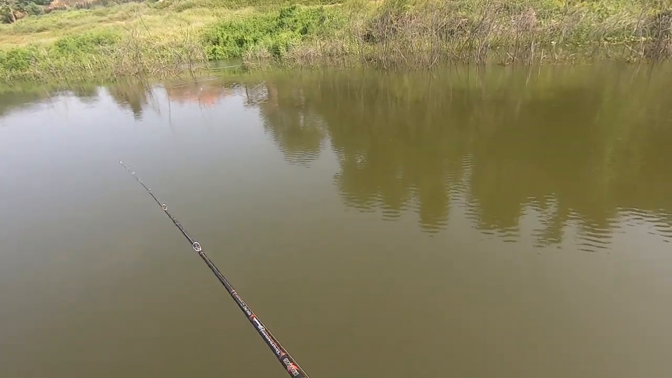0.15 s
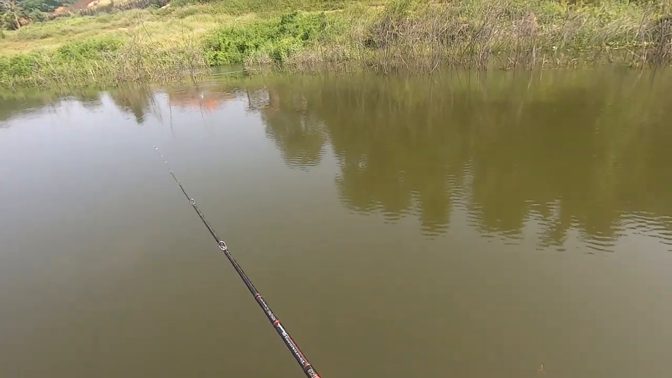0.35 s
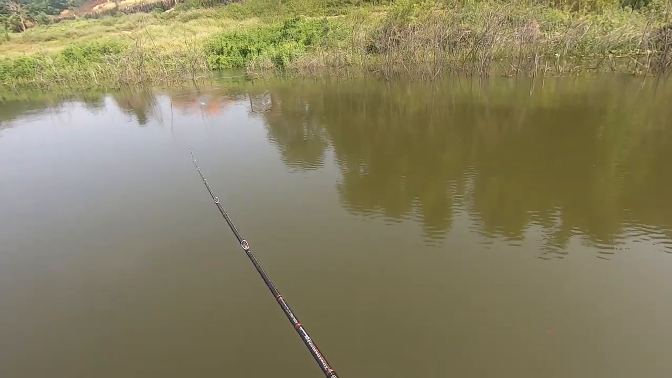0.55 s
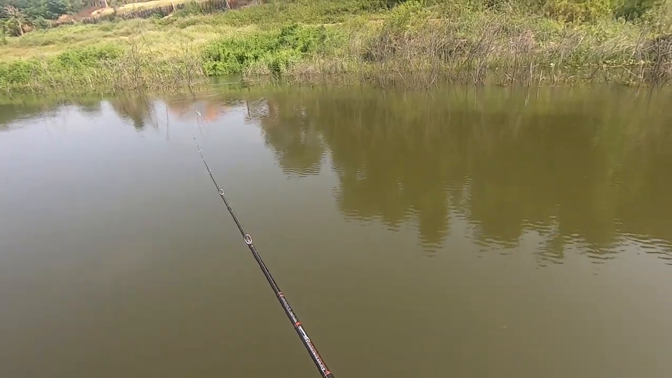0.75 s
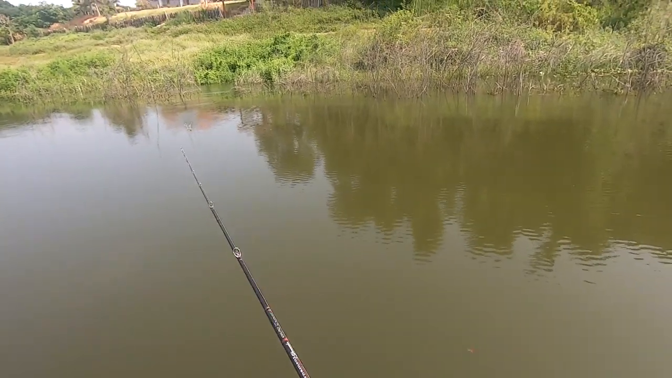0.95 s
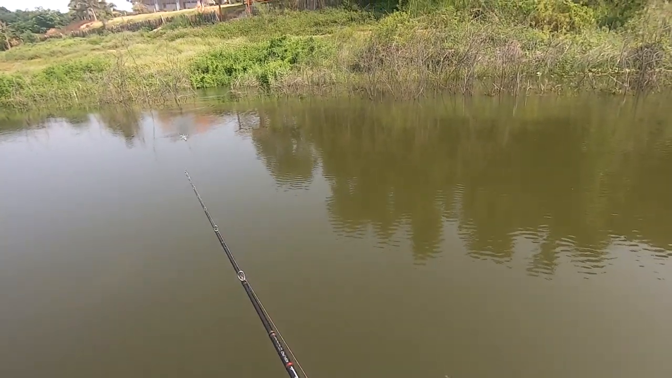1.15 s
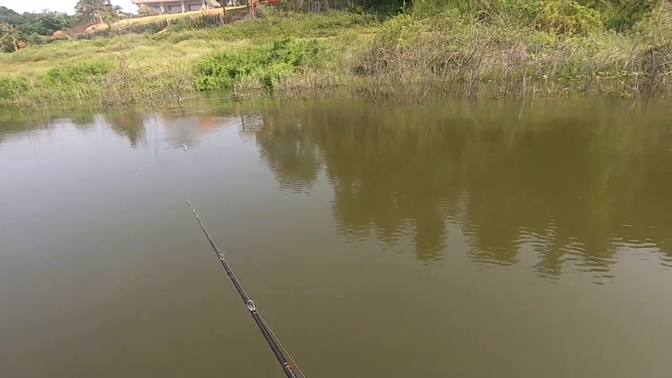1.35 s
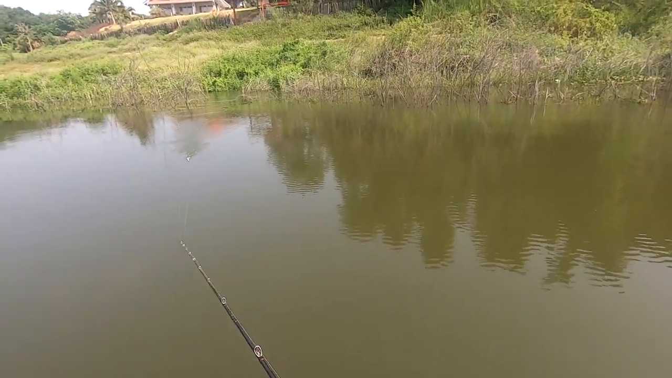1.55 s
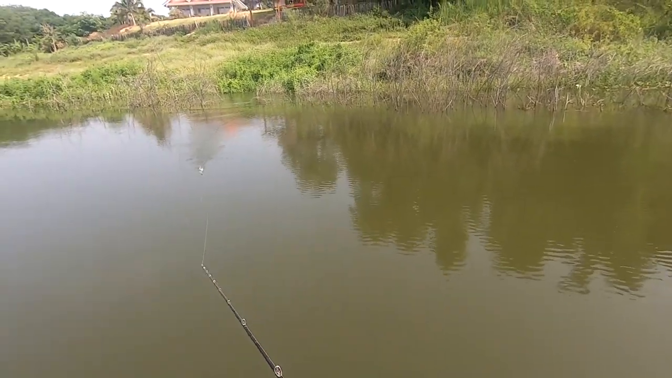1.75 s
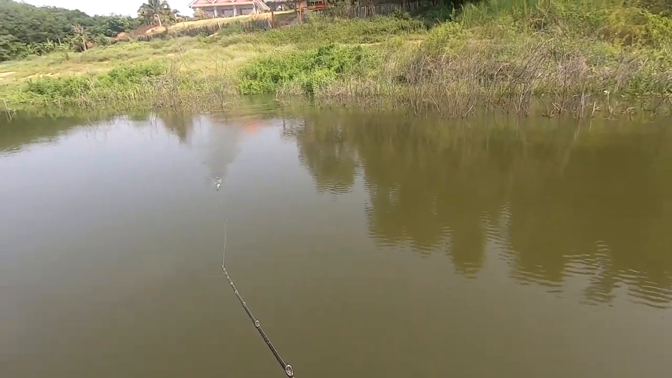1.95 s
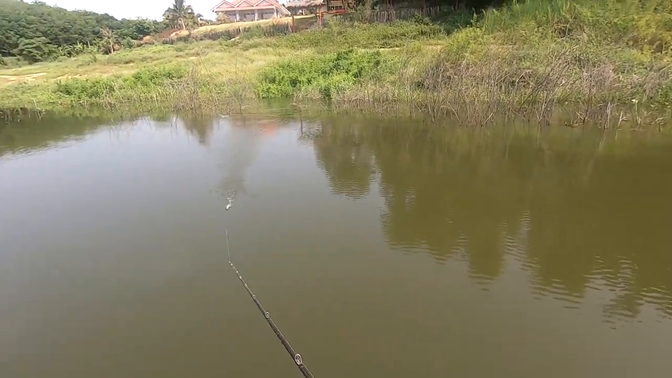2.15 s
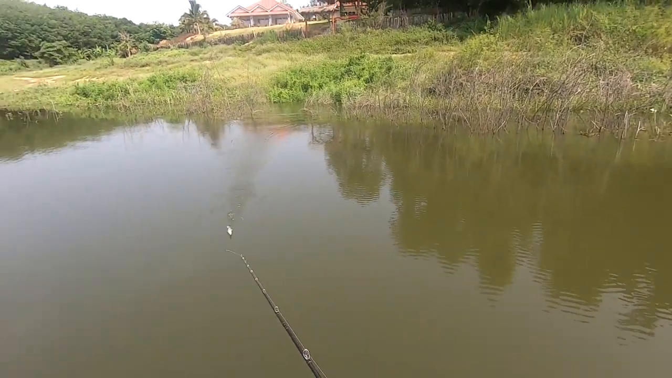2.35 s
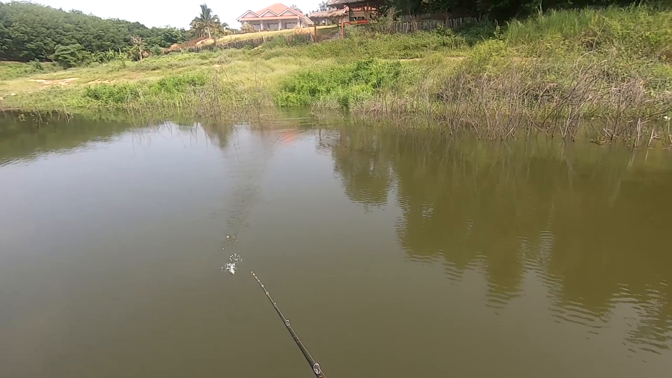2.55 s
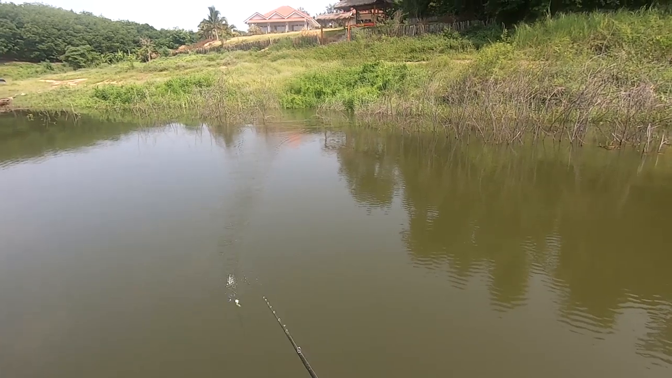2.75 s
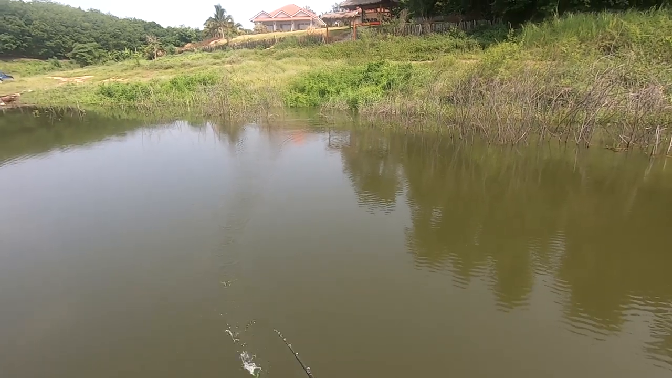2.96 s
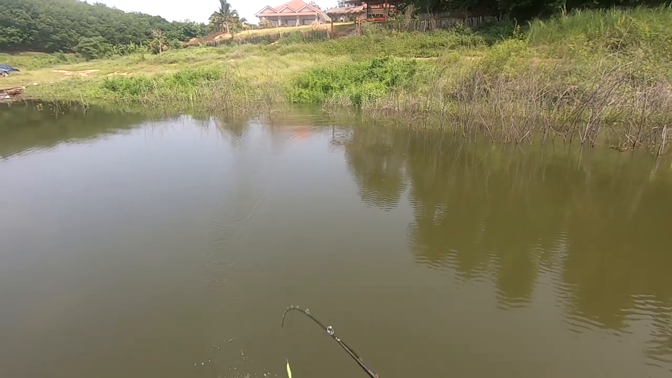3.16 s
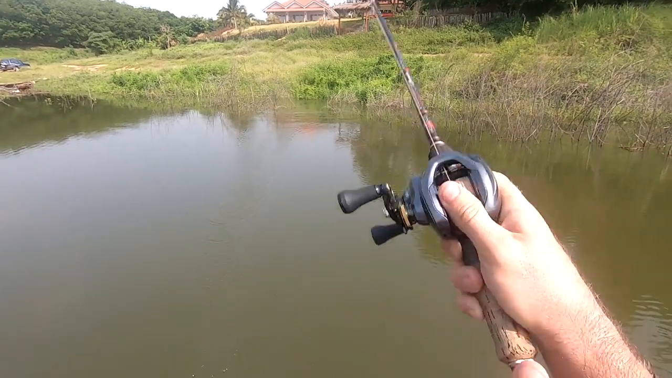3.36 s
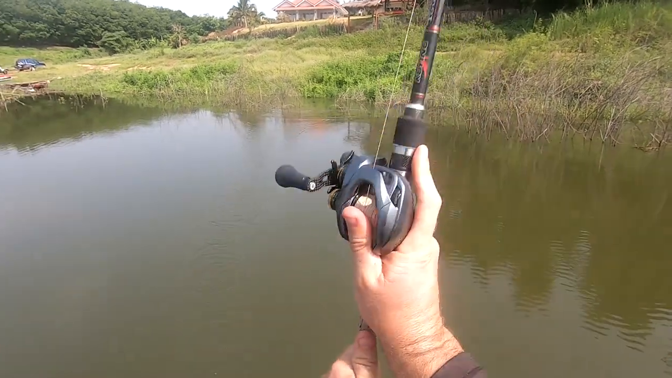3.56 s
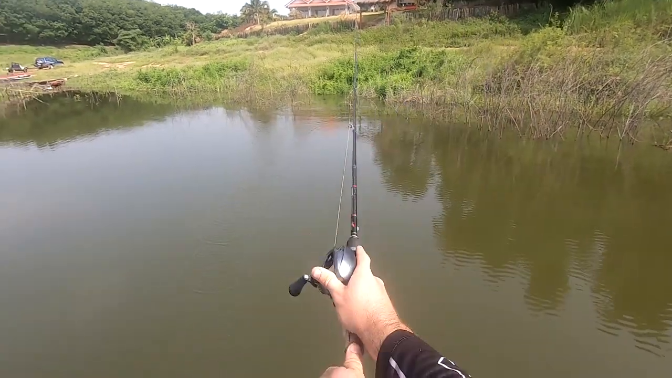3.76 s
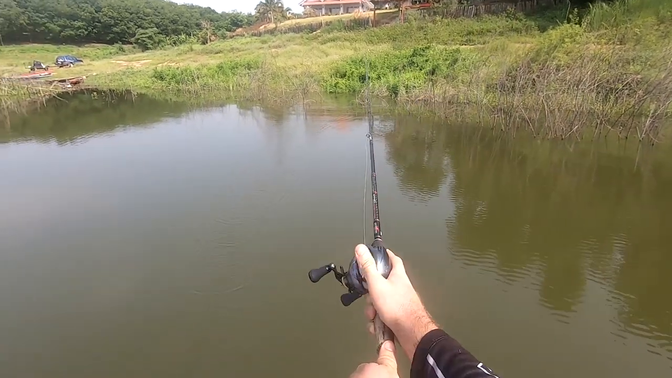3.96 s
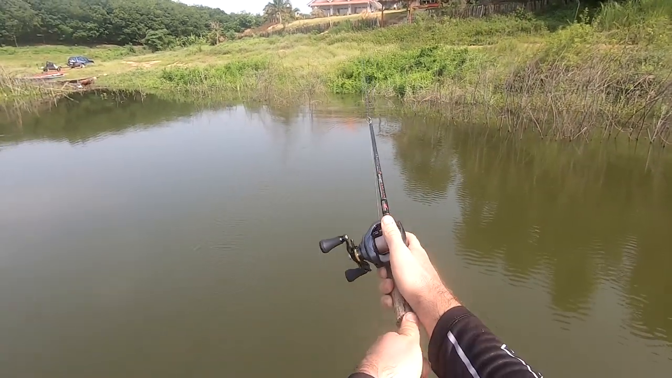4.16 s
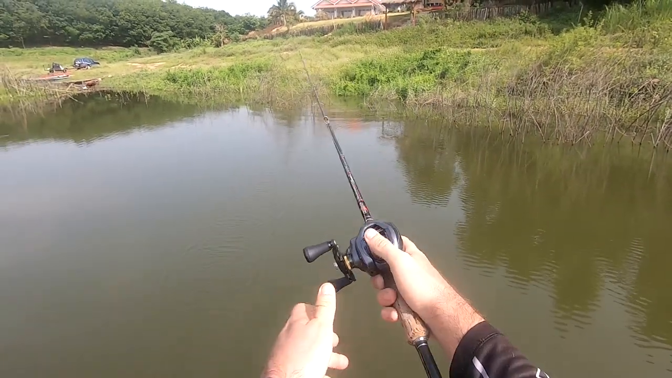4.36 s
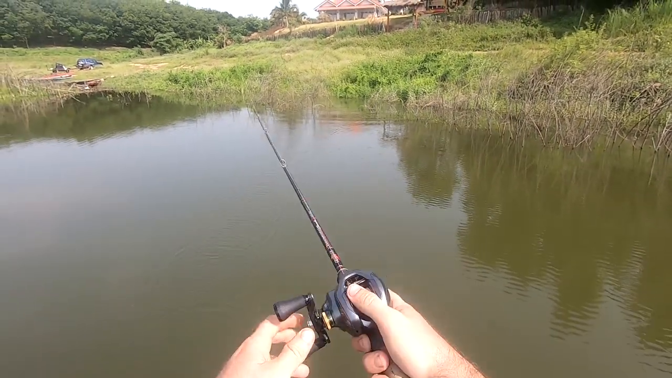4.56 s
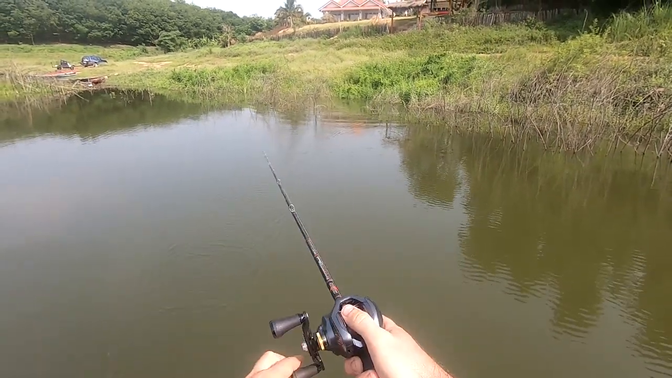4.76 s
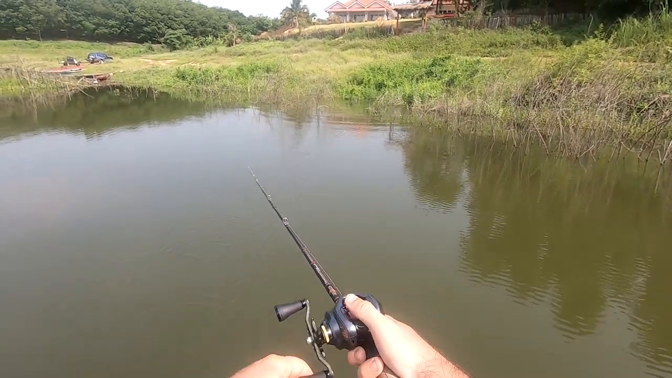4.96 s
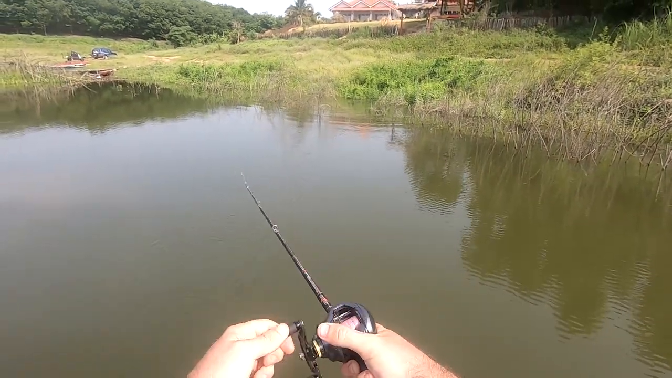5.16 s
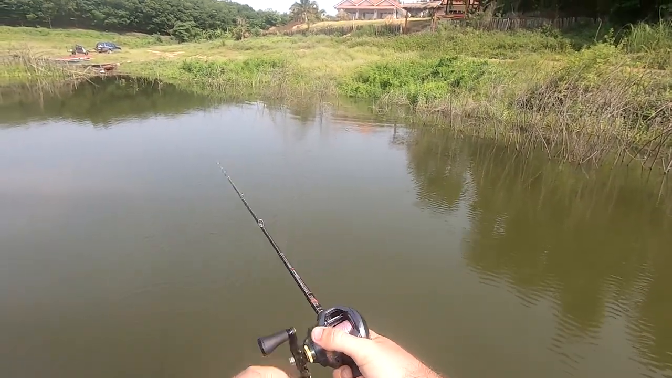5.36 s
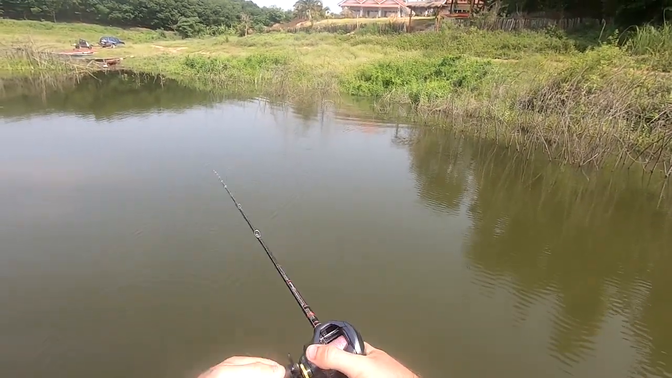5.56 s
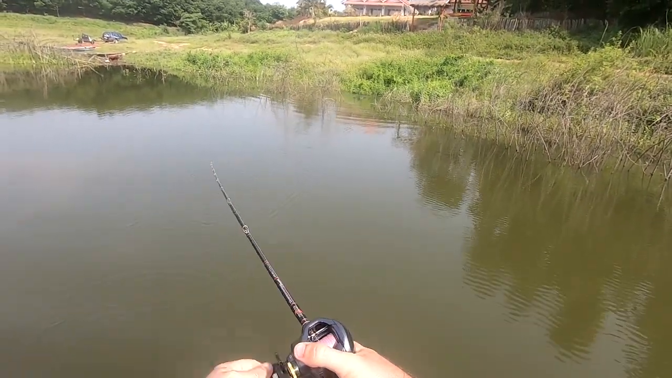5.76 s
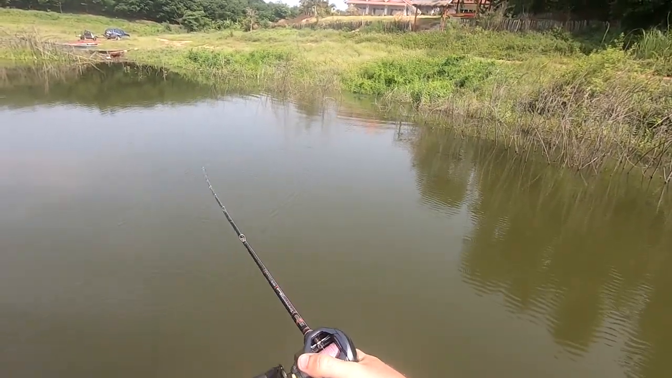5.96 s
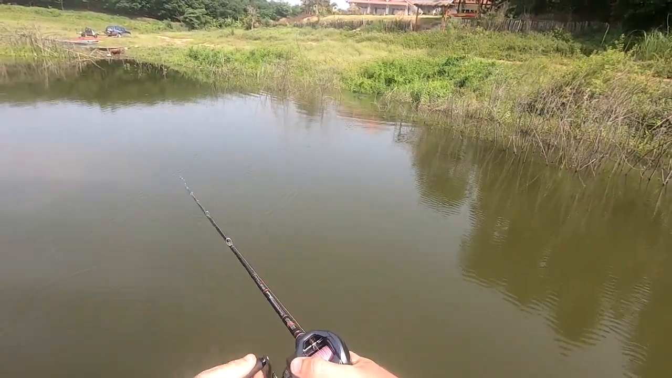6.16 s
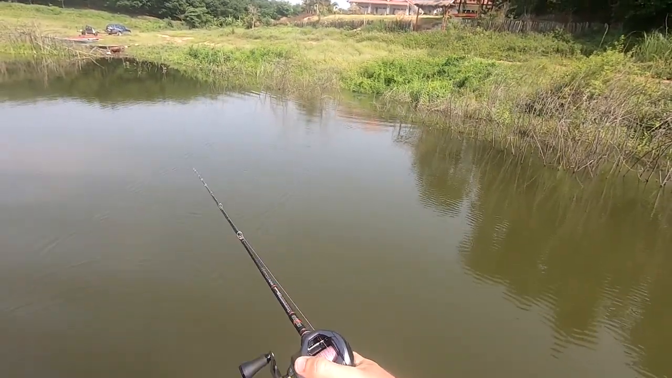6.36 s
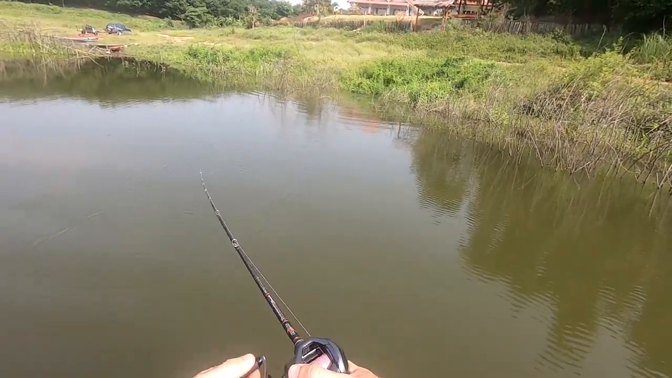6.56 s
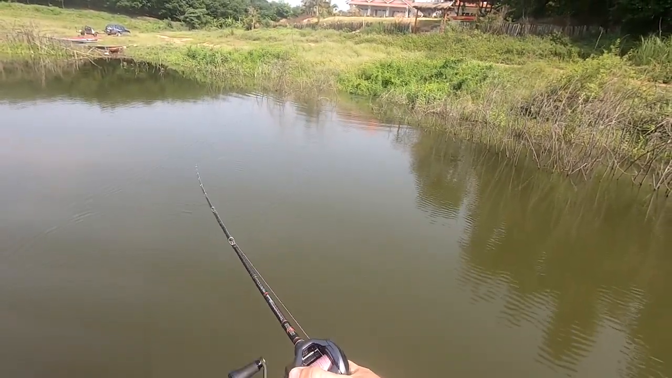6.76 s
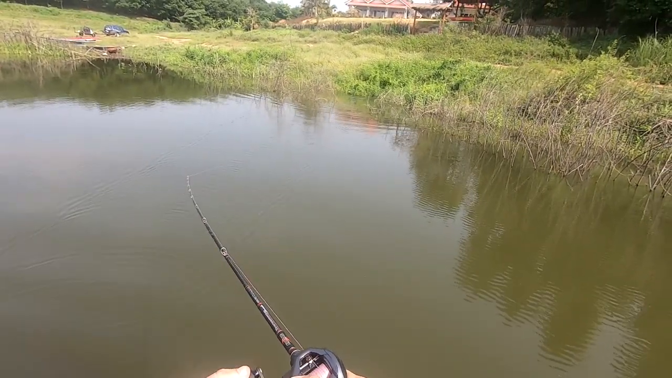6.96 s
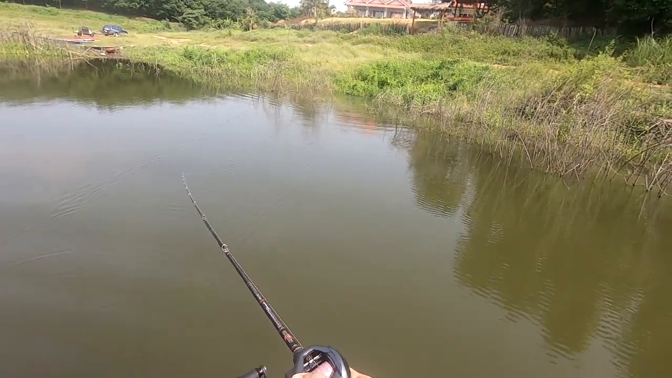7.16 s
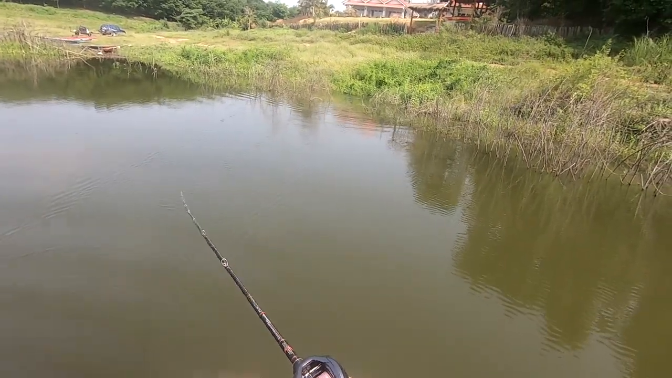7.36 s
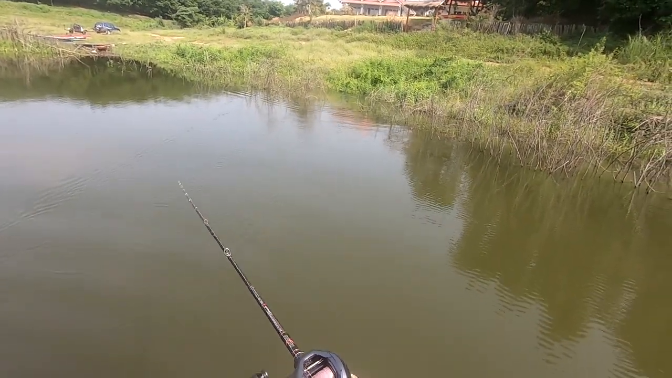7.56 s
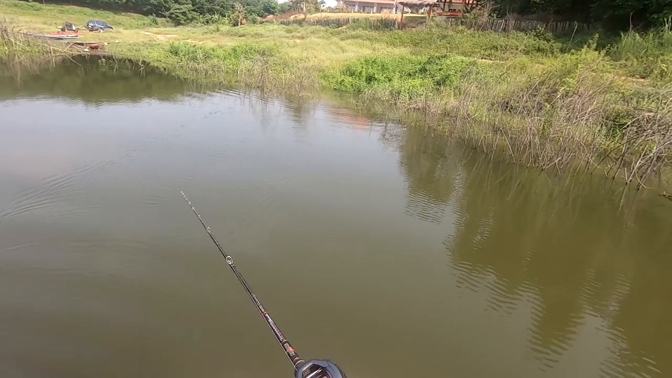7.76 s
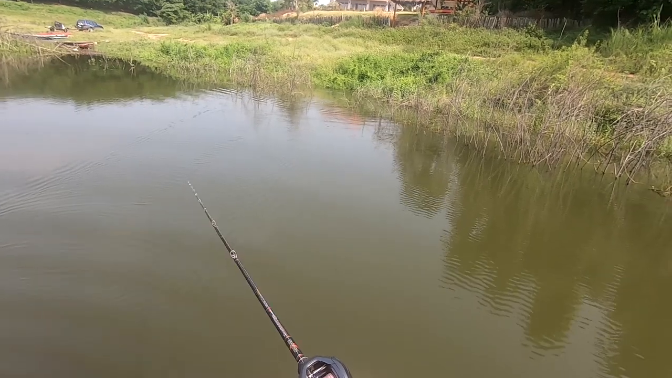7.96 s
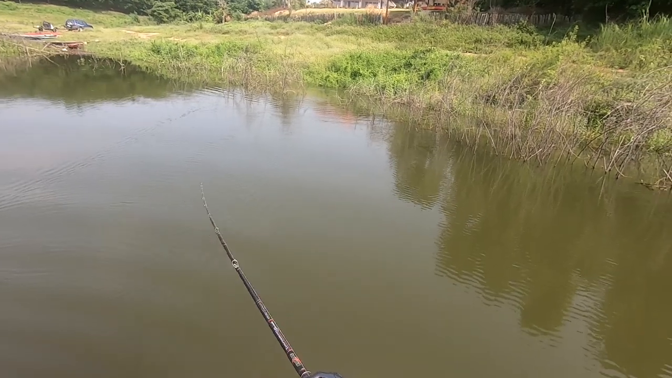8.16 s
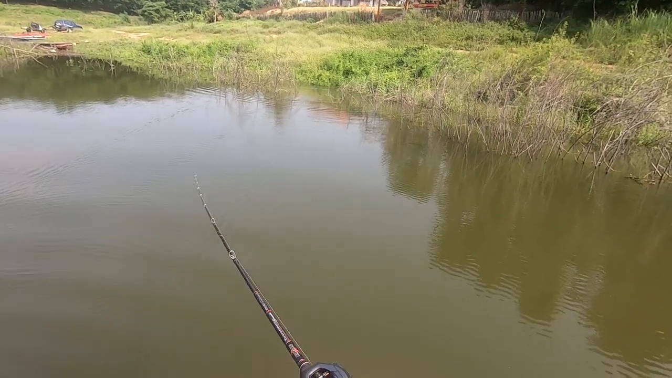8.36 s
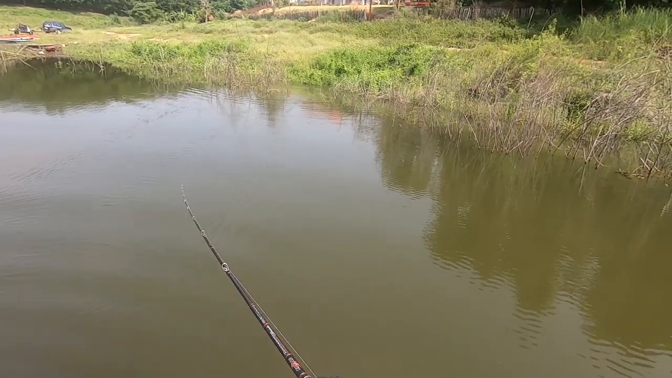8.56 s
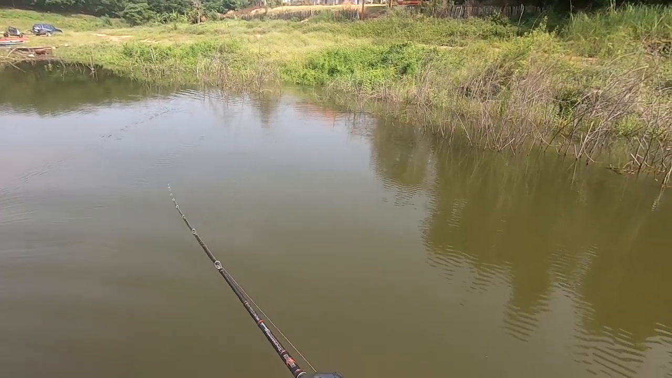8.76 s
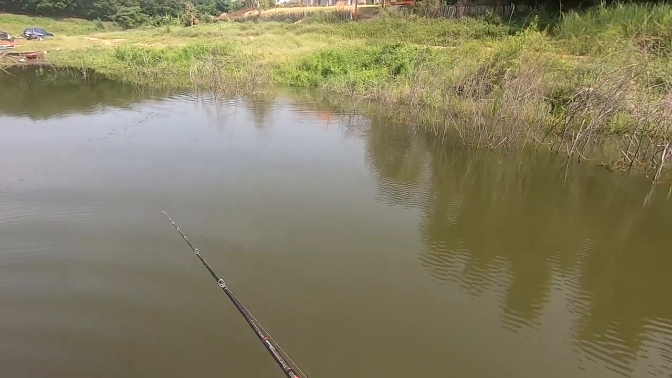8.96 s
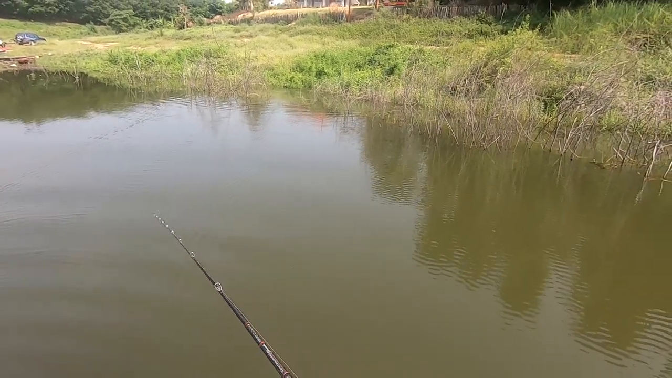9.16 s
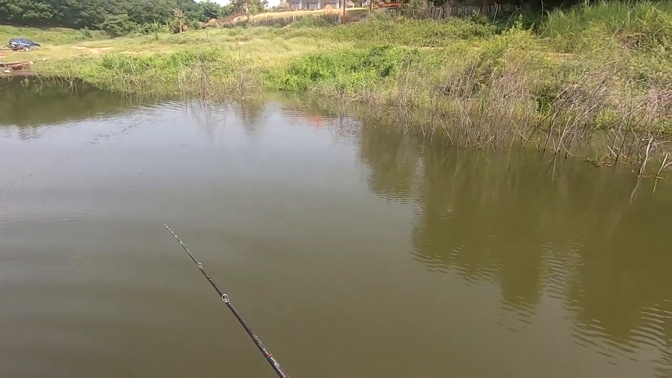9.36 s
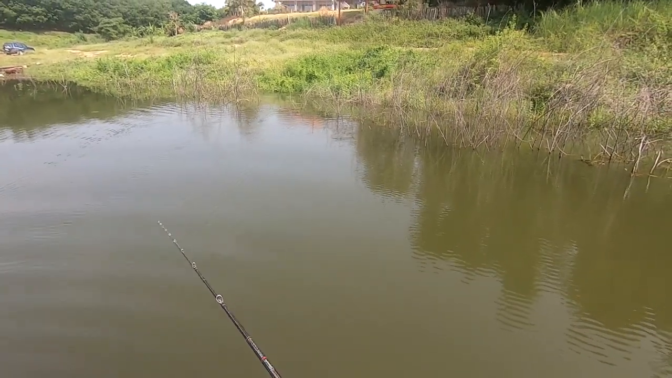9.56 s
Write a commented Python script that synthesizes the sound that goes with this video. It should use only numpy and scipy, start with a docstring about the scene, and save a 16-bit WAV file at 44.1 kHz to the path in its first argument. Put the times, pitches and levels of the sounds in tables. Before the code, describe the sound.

By a pond with a steady high insect whine, a reel rasps, knocks sharply, sings through a one-second cast, clunks and winds softly.

```python
"""A lure rasps and crackles in over a whining insect chorus, close to a small camera on a pond bank.
The angler knocks the reel's clutch, casts, and winds again with the lure far out.
Rasp and hiss are shaped noise, the spool's song and brake hum are sines, knocks are ringing reel modes.
One cricket chirps in falling strokes; fuzzy whistles, ticks and bubbles dot the scene,
and filtered noise makes wind and handling thuds on the two microphone ports."""
import sys
import numpy as np
from scipy import signal
from scipy.io import wavfile
from scipy.ndimage import uniform_filter1d

SR = 44100
rng = np.random.default_rng(int(sys.argv[2]) if len(sys.argv) > 2 else 0)


def store_pcm(level_fs):
    """Save levels as 16-bit WAV."""
    pcm = np.round(np.clip(level_fs, -1, 1) * 32767).astype(np.int16)
    wavfile.write(sys.argv[1], SR, np.atleast_2d(pcm).T)


N = 423801
T = np.arange(N) / SR  # s

# Spool running free, also line on the rod rings. Each row: frequency in Hz, level in dB per Hz.
SPOOL_SPECTRUM = [(300, -20), (800, -6), (1400, -12.5), (1800, -2), (3250, -8), (3800, -2), (5500, -10.5),
                  (8000, -39)]
# Treble fizz of line and spool. Each row: frequency in Hz, level in dB per Hz.
FIZZ_SPECTRUM = [(3000, -24), (5500, -10.5), (7500, -5), (11000, -18.5), (14000, -26.5)]
CAST_S, THUMB_S = 3.8, 4.79  # spool released, thumb comes down
SPIN_UP_S, TOP_HZ, SAG_HZ_PER_S = 0.12, 1900, 420  # the spool's song follows its speed


def gain_of(db):
    """Decibels to gain."""
    return 10 ** (np.asarray(db) / 20)


def evened(x):
    """Scales to rms 1."""
    return x / np.sqrt(np.mean(x ** 2) + 1e-20)


def read(points, hz):
    """Reads a spectrum table on a log-frequency axis."""
    f, value = np.transpose(points)
    return np.interp(np.log(hz + 1), np.log(f + 1), value)


def columns(rows, t):
    """The columns of a curve table at times t."""
    s, *rest = np.transpose(rows)
    return [np.interp(t, s, c) for c in rest]


def held(start, stop, rise, fall):
    """0 to 1 in rise seconds from start, back to 0 in fall seconds up to stop."""
    return np.clip(np.minimum((T - start) / rise, (stop - T) / fall), 0, 1)


def add(mix, s, sound, pan_db=-3):
    """Mixes a near sound in at s seconds; pan_db is left minus right."""
    part = mix[:, round(s * SR):][:, :sound.shape[-1]]
    part += gain_of([[pan_db / 2], [-pan_db / 2]]) * sound[..., :part.shape[1]]


def noise(shape, patchy_db, flicker_db, size=512, like=0.85):
    """Two-port noise from random short-time spectra, with drifting patches and wide-band flicker."""
    # Likeness of the ports. Each row: frequency in Hz, left-right likeness as a ratio.
    likeness = [(60, 0.53), (700, 0.64), (2700, 1), (5500, 0.35)]
    # Phase between the ports. Each row: frequency in Hz, right port phase in radians.
    right_phase = [(60, 0.67), (1400, 1.95), (2700, 0.5), (4900, 0.02), (9500, 4.83)]
    # Balance of the ports. Each row: frequency in Hz, left minus right in dB.
    balance = [(240, -0.5), (800, -3.5), (4000, -2.5)]
    frames, hz = 4 * N // size + 5, np.fft.rfftfreq(size, 1 / SR)
    a, b, c, d, patches = rng.standard_normal((frames, len(hz), 5)).T
    patches = uniform_filter1d(patches, size=6, axis=0)
    patches = evened(uniform_filter1d(patches, size=20, axis=1))
    flicker = evened(uniform_filter1d(rng.standard_normal(frames), size=3))
    same = np.clip(like * read(likeness, hz), -1, 1)[:, None]
    left = a + 1j * b
    right = same * left + np.sqrt(1 - same ** 2) * (c + 1j * d)
    right = right * np.exp(1j * read(right_phase, hz))[:, None]
    tilt = gain_of(read(balance, hz) / 2)[:, None]
    level_db = read(shape, hz)[:, None] + patchy_db * patches + flicker_db * flicker
    spectra = np.array([left * tilt, right / tilt]) * gain_of(level_db)
    return evened(signal.istft(spectra, nperseg=size, noverlap=size - size // 4)[1][:, :N])


def resonate(x, hz, width):
    """A resonance of gain 1, applied twice for steep skirts."""
    r = np.exp(-np.pi * width / SR)
    pole = r * np.exp(2j * np.pi * hz / SR)
    once = signal.lfilter([1 - r], [1, -pole], x)
    return 2 * signal.lfilter([1 - r], [1, -pole], once).real


def noise_burst(rate, draw):
    """A burst of noise, dying away at rate per second."""
    return draw * np.exp(-rate * np.arange(len(draw)) / SR)


def open_air():
    """The air over the pond: flickering noise, strongest in the bass."""
    # Each row: frequency in Hz, level in dB per Hz.
    air_spectrum = [(20, 9.5), (90, -10.5), (180, 0.5), (400, -14.5), (1200, -12), (6500, -18), (9000, -32),
                    (12000, -74)]
    return gain_of(-58) * noise(air_spectrum, patchy_db=-0.5, flicker_db=3.0, size=1024)


def insect_chorus():
    """Many far insects blur into resonant bands of noise."""
    # Each row: time in seconds, level in dB.
    chorus_level = [(0, -48.5), (9.61, -47)]
    # Each row: centre in Hz, width in Hz, level within the chorus in dB.
    bands = [(4911.5, 162, 2.5), (4785, 185, -1.5), (6150, 1920, -11)]
    hiss = noise([(20, 0), (20000, 0)], patchy_db=0, flicker_db=0)
    chorus = sum(gain_of(db) * evened(resonate(hiss, hz, w)) for hz, w, db in bands)
    return gain_of(columns(chorus_level, T)[0]) * evened(chorus)


def cricket():
    """One cricket stands out: four brief strokes a chirp, each a sine falling in pitch."""
    # Chirp starts in seconds.
    starts = [0.156, .429, .702, .982, 1.257, 1.53, 1.808, 2.074, 2.346, 2.612, 3.135, 3.4, 3.668, 4.735,
              4.984, 5.254, 5.523, 5.801, 6.069, 6.327, 6.589, 6.847, 7.117, 7.387, 7.676, 7.942, 8.205,
              8.482, 8.771, 9.025, 9.297, 9.57]
    # Each row: time in seconds, level in dB.
    cricket_level = [(2.8, -52.5), (7, -45.5), (9.3, -55.5)]
    out, t = np.zeros((2, N)), np.arange(700) / SR
    slips = rng.standard_normal((len(starts), 4))  # uneven pitch and level
    for s, db, slip in zip(starts, columns(cricket_level, starts)[0], slips):
        for k in range(4):
            hz = 6680 + 30 * slip[k] - 52000 * t
            stroke = np.sin(2 * np.pi * np.cumsum(hz) / SR) * np.hanning(len(t))
            add(out, s + 0.0243 * k, gain_of(db + slip[k]) * stroke, pan_db=4.5)
    return out


def thin_insect():
    """A thin, wavering insect tone."""
    # Each row: time in seconds, pitch in Hz, level in dB.
    thin_curve = [(7.8, 4040, -75), (8.38, 4090, -60.5), (8.63, 4100, -68.5), (9.61, 4070, -56.5)]
    return clean_note(thin_curve, pan_db=-3, waver_db=2.5, wander_hz=6)


def wind_and_handling():
    """Lumpy low pressure on the ports: quick swells that die away, partly shared."""
    # Gusts and grip rumble. Each row: start in seconds, level in dB, length in seconds, upper edge in Hz.
    gusts = [(0.174, -39.5, 0.21, 100), (0.539, -48, 0.31, 202), (0.792, -46, 0.26, 146),
             (1.041, -42.5, 0.096, 104), (1.407, -53, 0.6, 600), (1.856, -41.5, 0.62, 98),
             (2.302, -53, 0.7, 275), (3.058, -45.5, 0.47, 305), (3.68, -51, 0.3, 300),
             (3.886, -45.5, 0.19, 520), (4.387, -57.5, 0.6, 735), (7.383, -56, 0.17, 103)]
    out = np.zeros((2, N))
    for s, db, length, top_hz in gusts:
        u = np.arange(0, 1, 1 / (length * SR))  # share of the length
        band = signal.butter(2, [top_hz / 4, top_hz], "band", fs=SR, output="sos")
        a, b = signal.sosfilt(band, rng.standard_normal((2, len(u))))
        share = np.clip(top_hz / 400, 0, 0.9)  # grip rumble reaches both ports alike, wind does not
        lumps = evened(np.array([a, share * a + np.sqrt(1 - share ** 2) * b]))
        swell = np.minimum(u / 0.041, 1) * (1 - u) * 2
        add(out, s, gain_of(db) * lumps * swell, pan_db=-0.5)
    return out


def plops():
    """Soft thuds fall and bubbles rise in pitch: gliding sines that die away."""
    # Each row: start in seconds, peak in dB, first pitch in Hz, rise in octaves a second, t60 in seconds.
    plop_rows = [(3.01, -27.5, 230, -12, 0.021), (3.076, -18.5, 250, -35, 0.023),
                 (2.753, -34, 604, 2, 0.021), (7.811, -49, 378, 22.5, 0.13), (8.105, -54, 406, 30.5, 0.13),
                 (9.519, -52.5, 340, 2, 0.15)]
    out, t = np.zeros((2, N)), np.arange(9000) / SR
    for s, db, hz, rise, t60 in plop_rows:
        glide_hz = np.minimum(hz * 2 ** (rise * t), 900)
        plop = np.sin(2 * np.pi * np.cumsum(glide_hz) / SR) * gain_of(-60 * (t / t60) ** 2)
        add(out, s, gain_of(db) * plop * np.minimum(t / 0.0023, 1), pan_db=1.0)
    return out


def ticks():
    """Lure, line and handle tick: short resonant rings with a crack."""
    # Each row: start in seconds, peak in dB, pitch in Hz.
    tick_rows = [(0.039, -34, 2130), (0.0642, -28.5, 2750), (0.974, -37.5, 1700), (1.0097, -31.5, 2370),
                 (1.2773, -35.5, 2050), (2.097, -36, 1420), (2.296, -31.5, 2010), (2.624, -37, 2420),
                 (2.635, -35, 4070), (2.666, -28.5, 3250), (2.6933, -33, 2590), (2.7515, -32, 2010),
                 (2.777, -34, 2110), (3.0004, -37, 2000), (3.3944, -45, 1950), (3.6207, -35.5, 1670),
                 (4.96, -51, 1300), (5.08, -35, 1900), (8.5969, -36.5, 1770)]
    out = np.zeros((2, N))
    for s, db, hz in tick_rows:
        crack = noise_burst(255, rng.standard_normal(3000))
        tick = evened(resonate(crack, hz, 420)) + 0.037 * evened(crack)
        add(out, s, gain_of(db) * tick / np.abs(tick).max())
    return out


def fuzzy_note(out, width_hz, rows):
    """Adds a gliding tone blurred by slow noise; rows hold seconds, Hz and level in dB."""
    t = np.arange(rows[0][0], rows[-1][0], 1 / SR)
    hz, db = columns(rows, t)
    lowpass = signal.butter(2, width_hz, fs=SR, output="sos")
    wobble = signal.sosfilt(lowpass, rng.standard_normal((2, len(t))))
    fuzz = ((wobble[0] + 1j * wobble[1]) * np.exp(2j * np.pi * np.cumsum(hz) / SR)).real
    add(out, t[0], gain_of(db) * evened(fuzz) * signal.windows.tukey(len(t), 0.1))


def whistles():
    """Fuzzy whistles glide, swelling soon after their start and weakening to the end."""
    # Each row: start and length in seconds, first and last pitch in Hz, width in Hz, level in dB.
    whistle_rows = [(0.27, 0.43, 1400, 1448, 119, -52), (3.007, 0.1, 980, 1040, 38, -46.5),
                    (4.867, 0.82, 743, 648, 46, -58.5), (9.145, 0.22, 1460, 1430, 85, -58.5),
                    (4, .93, 8200, 6900, 380, -56.5), (.35, .06, 1380, 1450, 120, -42),
                    (3.864, .04, 1780, 1880, 170, -27)]
    rise, edge_db = 0.18, -3.5  # share of the length; level at either end against the peak
    out = np.zeros((2, N))
    for s, length, hz, end_hz, width, db in whistle_rows:
        peak = (s + rise * length, hz, db)
        fuzzy_note(out, width, [(s, hz, db + edge_db), peak, (s + length, end_hz, db + edge_db)])
    return out


def coos():
    """Rising fuzzy notes, one a handle turn."""
    # Each row: start in seconds, level in dB, pitch rise as a ratio.
    coo_rows = [(.48, -51, 1.2), (.71, -48.5, 1.44), (.94, -49.5, 1.22), (1.2, -49, 1.17)]
    out, coo_hz = np.zeros((2, N)), 600
    for s, db, rise in coo_rows:
        middle = (s + 0.0917, np.sqrt(rise) * coo_hz, db)
        fuzzy_note(out, 70, [(s, coo_hz, db), middle, (s + 0.17, rise * coo_hz, db - 11.0)])
    return out


def clean_note(rows, pan_db, waver_db, wander_hz, octave=0):
    """A sine on a curve of seconds, Hz and dB, wavering in level and wandering in pitch."""
    out = np.zeros((2, N))
    t = np.arange(rows[0][0], rows[-1][0], 1 / SR)
    hz, db = columns(rows, t)
    waver = uniform_filter1d(rng.standard_normal(len(t)), size=200)
    waver = evened(uniform_filter1d(waver, size=200))
    wander = evened(uniform_filter1d(waver[::-1], size=2500))
    phase = 2 * np.pi * np.cumsum(hz + wander_hz * wander) / SR
    phase = phase + [[0], [0.8]]  # the ports hear it out of step
    note = np.sqrt(2) * (np.sin(phase) + octave * np.sin(2 * phase))
    note = note * signal.windows.tukey(len(t), 0.015)
    add(out, t[0], gain_of(db + waver_db * waver) * note, pan_db)
    return out


def hoot():
    """A clean low note: one sine, its pitch and level following a curve."""
    # Each row: time in seconds, pitch in Hz, level in dB.
    hoot_curve = [(1.515, 648, -31), (1.57, 665, -37), (1.605, 612, -34.5), (1.63, 608, -19.5),
                  (1.652, 606, -33.5), (1.68, 617, -34), (1.85, 601, -62)]
    return clean_note(hoot_curve, pan_db=0, waver_db=1.5, wander_hz=0)


def crackle():
    """Wet line and gears spit short, uneven grains of many pitches."""
    grains_per_s, pitches = 160, 16
    t, out = np.arange(256) / SR, np.zeros((2, N))
    for hz in np.geomspace(1100, 5000, num=pitches):
        sizes = gain_of(4.9 * np.minimum(rng.exponential(1, N), 4))
        sizes = sizes * (rng.random(N) < grains_per_s / pitches / SR)
        grain = np.sin(2 * np.pi * hz * t) * t * hz * np.exp(-0.6 * hz * t)
        add(out, 0, signal.oaconvolve(sizes, grain)[:N])
    return gain_of(-11.5) * evened(out)  # dB against the rasp


def close_winding_and_scrapes():
    """Line and reel rasp and fizz as the lure comes in; line scrapes the rod rings in patchy noise."""
    # The lure wound in close. Each row: time in seconds, rasp in dB, fizz above the rasp in dB.
    retrieve = [(0, -51, -24), (.7, -47.5, -17.5), (3.1, -47.5, -7), (3.2, -57, -14)]
    # Lure close in. Each row: frequency in Hz, level in dB per Hz.
    near_spectrum = [(200, -8), (500, -5.5), (1500, -6.5), (4000, -12.5), (9000, -42)]
    # Line dragged over the rod rings. Each row: start in seconds, length in seconds, level in dB.
    scrapes = [(0.042, 0.071, -39), (2.658, 0.13, -46), (3.232, 0.13, -53.5), (3.5, 0.072, -51.5),
               (3.664, 0.15, -50.5)]
    rasp_db, fizz_db = columns(retrieve, T)
    near = gain_of(rasp_db) * (T < retrieve[-1][0])
    scrape = sum(gain_of(db) * held(s, s + length, 0.012, 0.024) for s, length, db in scrapes)
    out = near * noise(near_spectrum, patchy_db=3, flicker_db=1.5, size=256)
    out += scrape * noise(SPOOL_SPECTRUM, patchy_db=6.5, flicker_db=-1.0, size=256)
    out += near * crackle()
    fizz = near * gain_of(fizz_db) + 0.18 * scrape
    return out + fizz * noise(FIZZ_SPECTRUM, patchy_db=-0.5, flicker_db=3.5, size=256)


def far_winding():
    """Slow winding with the lure far out: gear noise and a murmur that throbs, drawing nearer."""
    # Gears only. Each row: frequency in Hz, level in dB per Hz.
    gear_spectrum = [(500, -33), (760, -4), (1070, -22), (1820, -1), (2550, -2.5), (3600, -11.5),
                     (5600, -52)]
    start_s, start_db, nearing_db_per_s = 5.08, -57.5, 0.22
    throb_per_s, throb_depth = 5.7, 0.65  # twice a handle turn
    unsteady = 40 * uniform_filter1d(rng.standard_normal(N), size=20000)
    throbs = np.cumsum(throb_per_s + unsteady) / SR
    far = gain_of(start_db + nearing_db_per_s * (T - start_s)) * held(start_s, 99, 0.17, 1)
    gears = noise(gear_spectrum, patchy_db=3.5, flicker_db=0.0, size=256)
    murmur = evened(resonate(gears, 785, 226))  # centre and width in Hz
    murmur = murmur * (1 + throb_depth * np.cos(2 * np.pi * throbs))
    return far * gears + gain_of(-7.5) * far * murmur


def reel_knocks():
    """Clutch and gear blows, each with a noisy after-rattle, ring the decaying modes of the reel body."""
    # Each row: start in seconds, peak in dB, centre of the blow in Hz, left minus right in dB,
    # after-rattle as a share of the blow.
    knocks = [(3.225, -7.5, 2900, -10, 0.013), (3.8045, -11.5, 5700, 2, 0.032),
              (3.8082, -18, 1900, -8, 0.065), (3.838, -19.5, 3550, 0, 0.11), (3.882, -8, 2740, -2, 0.045),
              (5.051, -19.5, 2800, -4.5, 0.086), (5.062, -13, 3420, 2, 0.057),
              (5.065, -13, 2170, -8, 0.036)]
    # Modes of the reel body. Each row: pitch in Hz, level in dB, t60 in seconds.
    reel_modes = [(745.2, 3.5, 0.016), (1870, 0.5, 0.0093), (2570, 5, 0.007), (3140, 8, 0.0031),
                  (4230, 8.5, 0.003), (5600, 2.5, 0.0039), (7920, 9.5, 0.002), (10500, 6.5, 0.0012)]
    out, t = np.zeros((2, N)), np.arange(3000) / SR
    highpass = signal.butter(2, 600, "high", fs=SR, output="sos")  # too small to radiate bass
    for s, db, centre_hz, pan_db, rattle in knocks:
        blow = (t == 0) + rattle * noise_burst(100, rng.standard_normal(len(t)))
        modes = np.zeros(len(t))
        for hz, mode_db, t60 in reel_modes:
            # a blow favours modes near its centre
            ring_db = mode_db - 4.9 * np.log2(hz / centre_hz) ** 2 - 60 * t / t60
            modes += gain_of(ring_db) * np.sin(2 * np.pi * (hz * t + rng.random()))
        body = signal.sosfilt(highpass, np.convolve(blow, modes)[:len(t)])
        body = gain_of(db) * body / np.abs(body).max()
        add(out, s, np.array([body, np.roll(body, 1)]), pan_db)  # right port a sample later
    return out


def brake_hum():
    """The brake hums through the cast: multiples of one pitch, each wavering in level."""
    # Levels in dB of the multiples from the second up, before the common gain of 1.53.
    multiples_db = [-56.5, -58.5, -58, -60.5, -76, -64, -68, -70, -65, -62]
    brake_hz = 975.2
    out, hum = np.zeros((2, N)), np.zeros(N)
    for k, db in enumerate(multiples_db, 2):
        waver_db = 3.9 * evened(uniform_filter1d(rng.standard_normal(N), size=3000))
        hum += gain_of(db + waver_db) * np.sin(2 * np.pi * (k * brake_hz * T + rng.random()))
    add(out, 0, 1.53 * held(3.7, 4.85, 0.3, 0.3) * hum)
    return out


def spool_song():
    """The spool sings from full speed, then sags steadily and fades as it slows."""
    song_db, hold_s = -44.5, 0.32
    top, end = CAST_S + SPIN_UP_S, THUMB_S - 0.18
    levels = [(top, song_db), (top + hold_s, song_db), (end - 0.12, song_db - 6.5), (end, song_db - 21)]
    rows = [(s, TOP_HZ - SAG_HZ_PER_S * (s - top), db) for s, db in levels]
    return clean_note(rows, pan_db=-4, waver_db=2.5, wander_hz=12.2, octave=0.3)


def spool_hiss():
    """The free spool hisses: a release jolt, then noise that flutters and swells as the line pays out."""
    hiss_db, jolt_db, swell_db = -47.5, -41.5, 6.5
    settle_s, stop_s = 0.085, 0.096  # jolt peaks and dies away; spool stops under the thumb
    song_cycles_per_spin, flutter = 9, 0.31
    paid_out = np.clip((T - CAST_S) / (THUMB_S - CAST_S), 0, 1)
    jolt = gain_of(jolt_db) * np.exp(-((T - CAST_S - settle_s) / 0.044) ** 2)
    flying = gain_of(hiss_db + swell_db * paid_out ** 2) + jolt
    flying = flying * held(CAST_S, THUMB_S + stop_s, settle_s, 2 * stop_s)
    song_hz = TOP_HZ - SAG_HZ_PER_S * (T - CAST_S - SPIN_UP_S)
    spins = np.cumsum(song_hz) / SR / song_cycles_per_spin
    flying = flying * (1 + flutter * np.cos(2 * np.pi * spins))  # once a spool turn
    hiss = noise(SPOOL_SPECTRUM, patchy_db=2.0, flicker_db=1.1, like=1.54)
    # the treble swells in slow bands
    treble = noise(FIZZ_SPECTRUM, patchy_db=3, flicker_db=-3.5, size=2048)
    return flying * hiss + gain_of(-1) * flying * treble


def scene():
    """Everything at the bank, from the open air to the reel at the microphones."""
    background = open_air() + insect_chorus() + cricket() + thin_insect() + wind_and_handling()
    details = plops() + ticks() + whistles() + coos() + hoot()
    winding = close_winding_and_scrapes() + far_winding()
    cast = reel_knocks() + brake_hum() + spool_song() + spool_hiss()
    return background + details + winding + cast


def record(dry):
    """The camera's housing dulls the top; then a steep filter sets the band limit."""
    dulled = signal.sosfilt(signal.butter(2, 9500, fs=SR, output="sos"), dry)
    band_limit = signal.firwin(511, 15300, window=("kaiser", 9), fs=SR)
    return signal.oaconvolve(dulled, band_limit[None], "same")


dry = scene()
out = record(dry)
store_pcm(out)
```